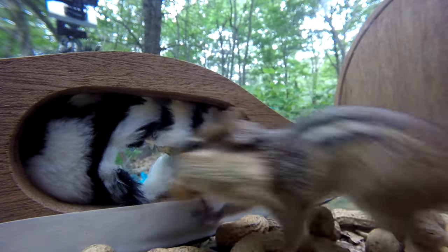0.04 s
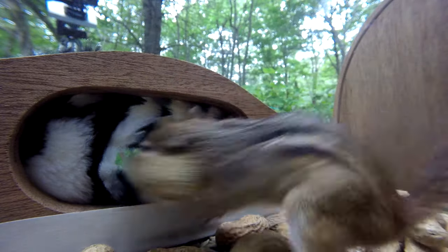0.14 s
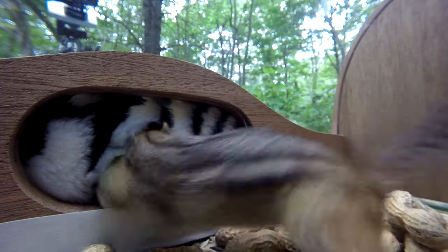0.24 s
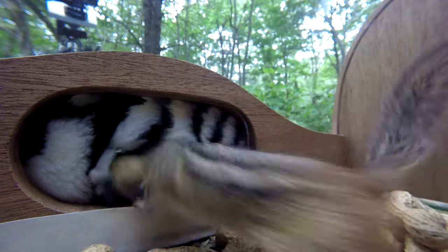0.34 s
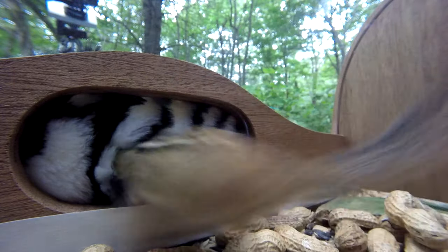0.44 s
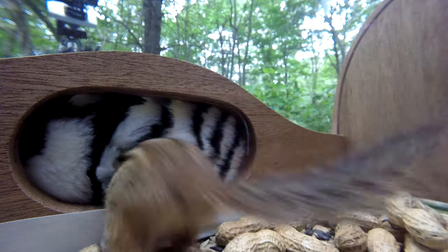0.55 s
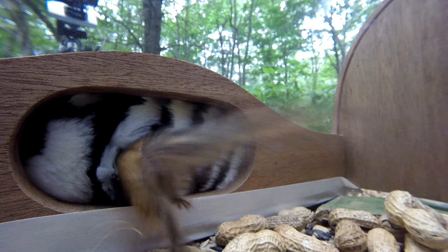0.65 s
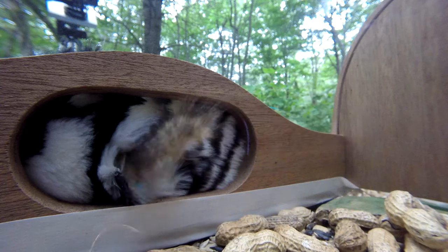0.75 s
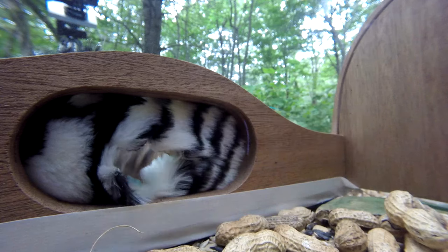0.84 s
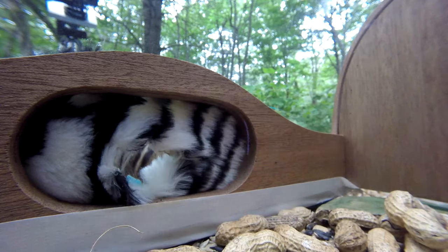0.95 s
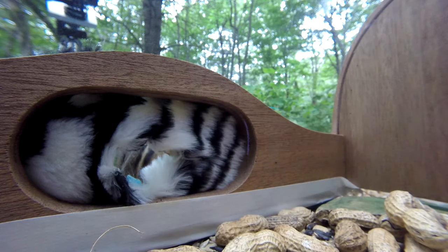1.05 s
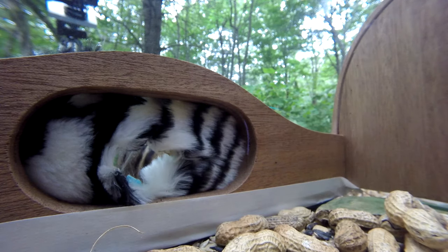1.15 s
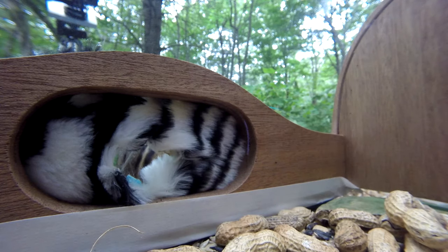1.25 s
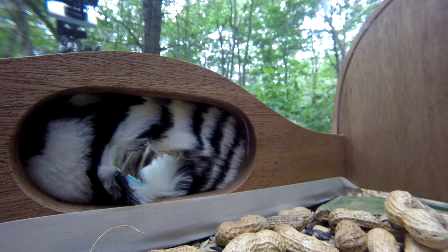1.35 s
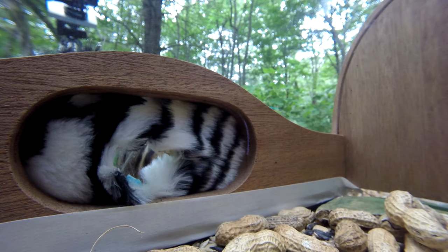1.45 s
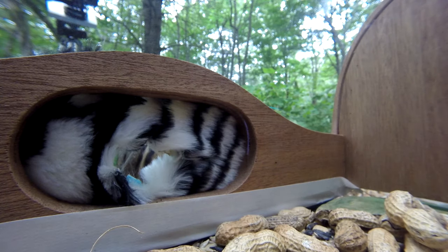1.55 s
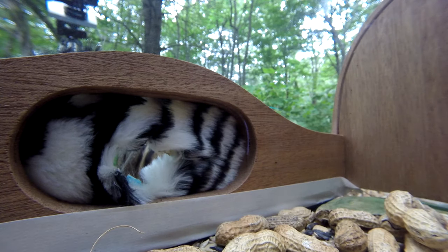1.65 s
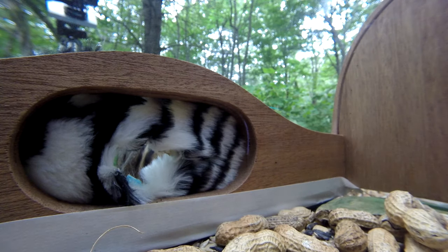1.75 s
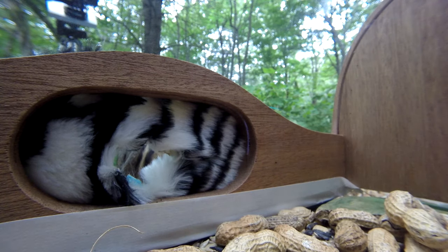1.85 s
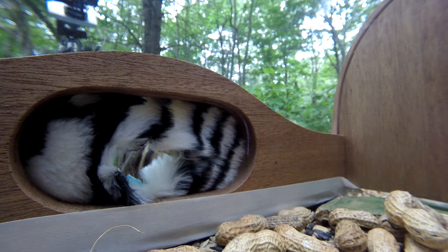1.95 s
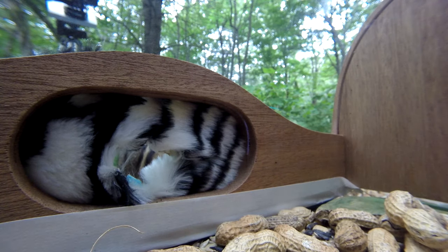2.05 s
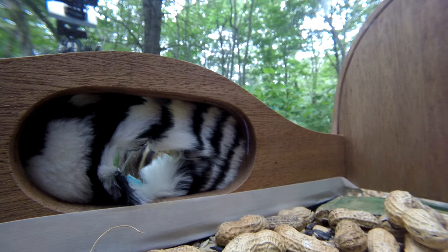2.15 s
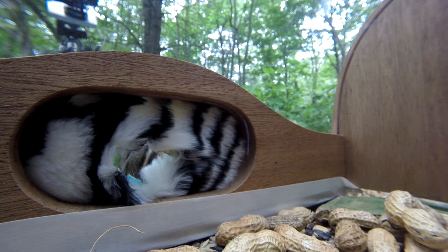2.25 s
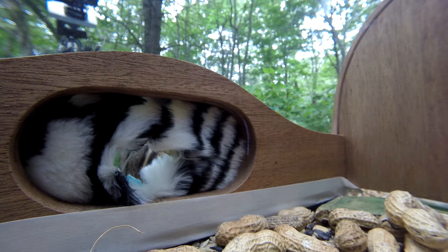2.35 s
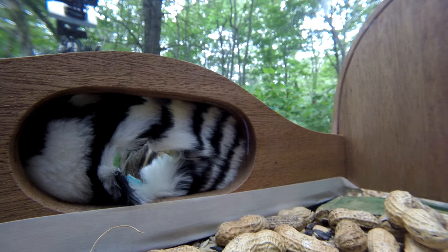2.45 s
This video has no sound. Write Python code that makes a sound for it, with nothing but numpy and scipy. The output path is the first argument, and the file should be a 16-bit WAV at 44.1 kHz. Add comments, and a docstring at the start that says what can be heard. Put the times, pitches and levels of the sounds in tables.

```python
"""A small rodent scrambles over peanuts in their shells on the floor of a wooden box, in woodland air.
For the first second paws thud as pulses exciting board modes, shells knock as resonators struck by clicks,
uneven grains shake, rattle and rustle, and claws scratch as short bursts of band-passed clicks.
It climbs through an opening and jumps off; the two strongest thuds, near 0.86 s, end the footfalls.
Later a few shells settle with faint knocks and two scratches; filtered noise hisses behind throughout."""
import sys
import numpy as np
from scipy import signal
from scipy.io import wavfile

SR = 44100
rng = np.random.default_rng(int(sys.argv[2]) if len(sys.argv) > 2 else 0)


def wav_out(sig):
    """Save sig, one row per channel (or a flat mono array), as 16-bit PCM at SR to the path in sys.argv[1]."""
    wavfile.write(sys.argv[1], SR, np.round(np.clip(np.atleast_2d(sig).T, -1, 1) * 32767).astype(np.int16))


N = 110250

# paws landing on the boards:
# (time [s], push level [dB], contact length [ms], extra push on the lowest mode [dB])
PAW_LANDINGS = [(0.201, -25, 3.3, -17), (0.213, -29.5, 4.7, -25), (0.253, -29, 1.34, -21),
                (0.325, -18.5, 2.5, -21), (0.356, -22, 5.2, -11), (0.518, -27, 3, 5),
                (0.594, -30.5, 1.8, -23), (0.685, -23, 10.7, 7.5), (0.798, -43, 2.4, -23),
                (0.8554, -7, 7.1, -12), (0.869, -7, 5.96, 1.5)]
# shells knocking:
# (time [s], peak level [dB], shell pitch [Hz], longest clatter [ms], wall brightness [dB per octave])
SHELL_KNOCKS = [(.124, -41, 2380, 3.0, 3), (0.141, -28.5, 2240, 2.8, 13), (0.153, -31, 1650, 7.1, -8),
                (.206, -31, 2270, 2.3, -2), (.216, -23, 930, 5.6, -6), (.242, -14, 1810, 2.76, 6.5),
                (0.256, -22, 1020, 4.2, 2), (0.3086, -17.5, 748, 2.5, -6), (.315, -24.5, 1500, 2.85, -7),
                (.323, -20, 1630, 5.3, 1.5), (0.333, -22, 1630, 2.5, 2), (.354, -32, 2360, 3.9, 0),
                (0.397, -3, 1520, 3.98, 1.3), (.504, -23, 2080, 2, 1.5), (.522, -29, 980, 5.5, 1),
                (0.535, -24.5, 1310, 2.73, -0.2), (.547, -33, 840, 3.8, -3), (0.576, -46, 1740, 4.4, 7),
                (0.579, -22.5, 830, 3.35, -2), (.604, -41, 2330, 2.5, 12), (.629, -30, 1776, 2, 7),
                (0.64, -27, 1850, 5.6, -14), (.701, -29.5, 2420, 4.0, 5), (.748, -34, 850, 3.4, -1),
                (.764, -27, 810, 2.9, -5.5), (.856, -25, 1120, 6.3, -6), (0.865, -38, 1020, 3.8, -1),
                (1.145, -38, 1850, 3.8, -2.5), (1.209, -46, 1000, 2.6, -3), (1.286, -48, 1870, 2, 1.5),
                (1.826, -44.5, 2290, 2.5, 1.5), (2.397, -45, 1960, 3.0, 2)]
# uneven motion of the scramble:
# (time [s], board shaking [dB], dull rattle [dB], bright rattle [dB], treble rustle [dB])
SCRAMBLE_LEVELS = [(0, -45.5, -57, -54.5, -54.5), (.09, -50.5, -61, -57.5, -64),
                   (0.113, -53.5, -73, -75, -84), (0.124, -50, -52, -52, -54),
                   (.146, -37.5, -37.5, -35.5, -40.5), (0.174, -41, -52, -49, -57),
                   (0.206, -27, -41.5, -42, -42), (.26, -24, -34, -34, -41.5),
                   (.287, -28.5, -40, -41.5, -50.5), (.312, -38, -44, -32, -38),
                   (0.333, -23.5, -38, -40, -50), (0.362, -23, -35.5, -36, -37),
                   (0.386, -36, -38, -39.5, -51), (.42, -34, -43.5, -47, -49), (.484, -37, -51, -54.5, -63),
                   (.51, -37, -51, -43, -51), (0.541, -28, -31, -47, -55),
                   (0.564, -40.5, -48.5, -55.5, -59.5), (0.584, -32, -47, -34, -51.5),
                   (0.598, -32.5, -45.5, -49, -56), (0.634, -35.5, -38.5, -36.5, -42),
                   (.66, -34.5, -46.5, -44.5, -56), (.696, -33.5, -48, -49, -52.5),
                   (.77, -33, -40.5, -49, -54.5), (0.799, -34, -47.5, -55, -60.5),
                   (0.831, -58.5, -81, -70, -78), (0.85, -32, -50.5, -50, -55),
                   (0.86, -30, -39, -44.5, -57), (.89, -32, -53, -53.5, -58), (.95, -42, -75, -69, -71.5),
                   (1.001, -53, -73, -74, -74)]
# claws scratching: (time [s], level before shaping [dB], centre frequency [Hz], decay length [ms])
CLAW_SCRATCHES = [(.025, -54, 9400, 8.7), (.082, -54.5, 10500, 6), (.138, -41.5, 6500, 13.5),
                  (.201, -41, 8400, 5.8), (.238, -39.5, 5950, 34), (.267, -31, 7900, 3.1),
                  (.31, -38, 5470, 5.3), (.353, -33, 6640, 2.8), (.122, -49, 5000, 8),
                  (.254, -39, 6500, 4.5), (0.298, -46, 8950, 6.7), (0.335, -42, 6100, 7.2),
                  (.366, -49, 8100, 7.2), (.503, -45, 3870, 3.7), (.536, -52, 6000, 5),
                  (.397, -35.5, 4930, 7.4), (.515, -56, 8050, 8), (.62, -52, 5470, 30),
                  (0.852, -46.5, 3840, 10), (1.579, -61, 5400, 5.5), (1.824, -60, 4280, 5.7)]
# resonances of the boards, the first used for depth: (frequency [Hz], level [dB], decay by 60 dB [s])
BOARD_MODES = [(69.7, -5.5, 0.2), (138.4, 0, 0.096), (189, 0, 0.088), (348.6, -2.5, 0.075),
               (376.6, -4, 0.059), (475, 4.5, 0.053), (626, -39, 0.055), (106, -13, 0.087)]
# resonances of walls and shells: (frequency [Hz], level [dB], decay by 60 dB [s])
WALL_MODES = [(524, -10.5, .03), (607, -15.5, 0.069), (814.5, -4.5, 0.032), (1041, -4.5, .035),
              (1520, -2.5, 0.0083), (1850, -6, 0.018), (2017, -6.5, 0.016), (2272, -3.5, 0.014),
              (2692, -2, 0.0067), (3340, -14.5, 0.013), (3780, -26, 0.016), (4650, -19, 0.0071)]
# spectrum of the rustle: (frequency [Hz], level [dB])
RUSTLE_SPECTRUM = [(1500, -9.5), (2500, 12.5), (3600, -8), (4800, 9), (6000, 0.5), (7500, -13.5),
                   (10500, -8), (14500, -8.5), (15500, -36)]
# spectrum of the woodland air: (frequency [Hz], level [dB per Hz])
AIR_SPECTRUM = [(12, -33), (20, -2.5), (64, 0), (157, -2.5), (190, -4), (231, -9.5), (371, -10),
                (451, -14.5), (580, -13.5), (1920, -22), (13800, -45.5), (15500, -53)]

SHELL_T60_S, SHELL_RISE_T60_S, KNOCK_CUT_HZ = 0.025, 0.0047, 7000
WALL_SHARE_DB = -1   # walls over shell, for a knock peaking at -16 dB
SHELL_FOLLOWS = 0.11   # harder blows ring the shell more: dB of shell over walls per dB of blow
RATTLE_PER_S, RATTLE_SPREAD_DB, SHAKE_PER_S = 1500, 3.5, 450
SCRATCH_PER_S, SCRATCH_WIDTH_OCT = 3700, 0.6
SCRATCH_RISE = 0.17   # share of the decay length
AIR_DB = -50
CUTOFF_HZ = 15850


def footfalls():
    """Modal excitation: a raised-cosine contact pulse drives the boards, the lowest mode separately."""
    push, deep = np.zeros(N), np.zeros(N)
    for time_s, db, contact_ms, deep_db in PAW_LANDINGS:
        pulse = np.hanning(int(contact_ms * SR / 1000))
        pulse = pulse / pulse.sum()
        start = int(time_s * SR)
        push[start:][:len(pulse)] += from_db(db) * pulse
        deep[start:][:len(pulse)] += from_db(db + deep_db) * pulse
    # the minus sign keeps the mode signs alternating
    return body(deep, BOARD_MODES[:1]) - body(push, BOARD_MODES[1:])


def knocks():
    """Cascaded resonance: each shell swells and decays while six weakening touches ring the walls."""
    out, span = np.zeros(N), 3000
    chance = rng.random((len(SHELL_KNOCKS), 12 + len(WALL_MODES)))
    wall_filter = signal.butter(2, [420, KNOCK_CUT_HZ], "band", fs=SR, output="sos")
    for (time_s, db, hz, clatter_ms, tilt_db), draw in zip(SHELL_KNOCKS, chance):
        touches = np.zeros(span)
        lag = np.sort(draw[:6]) - draw[:6].min()   # share of the longest clatter
        touch_db = -16 * lag - 3.7 * draw[6:12] * (lag > 0)
        touches[(lag * clatter_ms * SR / 1000).astype(int)] = from_db(touch_db)

        # brightness tilts about 1400 Hz, and chance weakens each mode by up to 4 dB
        modes = [(f, level + tilt_db * np.log2(f / 1400) - 4 * d, t60)
                 for (f, level, t60), d in zip(WALL_MODES, draw[12:])]
        walls = rms_one(signal.sosfilt(wall_filter, body(touches, modes)))

        first_touch = touches * (np.arange(span) == 0)
        shell = ring(ring(first_touch, hz, SHELL_T60_S), hz, SHELL_RISE_T60_S)
        wall_db = WALL_SHARE_DB - SHELL_FOLLOWS * (db + 16)
        sound = rms_one(shell) + from_db(wall_db) * walls
        out[int(time_s * SR):][:span] += from_db(db) * sound / np.abs(sound).max()
    return out


def scramble():
    """Random-impulse excitation: pushes shake the boards; ticks rattle the walls and feed the rustle."""
    times_s, *columns = np.transpose(SCRAMBLE_LEVELS)
    clock = np.arange(N) / SR
    shake, dull, bright, rustle = (
        from_db(np.interp(clock, times_s, c, right=-120)) for c in columns)
    pushes = band(grains(SHAKE_PER_S, 1.73), 108, 293)
    shaking = rms_one(body(pushes, BOARD_MODES))

    ticks = grains(RATTLE_PER_S, RATTLE_SPREAD_DB) * from_db(0.5 * drift(59))
    dull_level = dull * from_db(1.9 * drift(67))
    bright_level = bright * from_db(1.9 * drift(62))
    rattle = 0
    for level, modes in ((dull_level, WALL_MODES[:4]), (bright_level, WALL_MODES[4:])):
        rattle = rattle + body(ticks * level, modes) / np.std(body(ticks, modes))

    grainy_noise = rms_one(ticks) + 2.14 * rng.standard_normal(N)
    rustling = coloured([grainy_noise], RUSTLE_SPECTRUM, patchy_db=0.5)
    return shake * shaking + rattle + rustle * rustling


def scratches():
    """Friction as dense impulses: band-passed clicks rise linearly under a Gaussian decay."""
    out, span = np.zeros(N), 2048
    t_ms = np.arange(span) / SR * 1000
    spread = 2 ** (SCRATCH_WIDTH_OCT / 2)
    for time_s, db, hz, length_ms in CLAW_SCRATCHES:
        rise = np.minimum(t_ms / (SCRATCH_RISE * length_ms), 1)
        shape = rise * np.exp(-(t_ms / length_ms) ** 2)
        clicks = grains(SCRATCH_PER_S, 3.9, size=span)
        rasp = rms_one(band(clicks, hz / spread, hz * spread))
        out[int(time_s * SR):][:span] += from_db(db) * shape * rasp
    return out


def air():
    """Broadband noise: a bass-heavy outdoor hiss whose bands waver slightly."""
    return from_db(AIR_DB) * coloured(rng.standard_normal((2, N)), AIR_SPECTRUM, patchy_db=0.65)


def from_db(db):
    """Logarithmic level: amplitude gain grows tenfold per 20 dB."""
    return 10 ** (np.asarray(db) / 20)


def rms_one(x):
    """Power normalisation: scale to a root mean square of 1."""
    return x / np.sqrt(np.mean(x ** 2) + 1e-20)


def band(x, low_hz, high_hz):
    """Band limitation by a Butterworth band-pass."""
    sos = signal.butter(2, [low_hz, min(high_hz, .45 * SR)], "band", fs=SR, output="sos")
    return signal.sosfilt(sos, x)


def drift(rate_hz):
    """Low-passed noise: a slow random fluctuation of rms about 1."""
    step = 40   # samples between computed points
    r = np.exp(-2 * np.pi * rate_hz * step / SR)
    noise = rng.standard_normal(N // step + 2002)
    slow = signal.lfilter([1], [1, -2 * r, r * r], noise)[2000:]   # skip the start-up
    return np.interp(np.arange(N) / step, np.arange(len(slow)), rms_one(slow))


def ring(clicks, hz, t60):
    """Damped resonance: a unit click starts a decaying sine of initial height 1."""
    r, w = from_db(-60 / (t60 * SR)), 2 * np.pi * hz / SR
    return signal.lfilter([0, np.sin(w)], [1, -2 * r * np.cos(w), r * r], clicks + 1e-18)


def body(clicks, modes):
    """Modal superposition: damped resonances add with alternating signs."""
    return sum((-1) ** k * from_db(db) * ring(clicks, hz, t60)
               for k, (hz, db, t60) in enumerate(modes))


def grains(per_s, spread_db, size=N):
    """Random impulse process: sparse clicks of uneven size and sign."""
    sizes_db = spread_db * np.minimum(rng.exponential(1, size), 4)
    sizes = from_db(sizes_db) * rng.choice([-1, 1], size)
    return sizes * (rng.random(size) < per_s / SR) + 1e-9


def coloured(sources, spectrum, patchy_db):
    """Spectral shaping: half-octave bands flicker separately and sum to rms 1."""
    out, edges, points = 0, 20 * 2 ** np.arange(0, 10, .5), np.array(spectrum)
    for k, (low, high) in enumerate(zip(edges, edges[1:])):
        log_centre = np.log(low * high) / 2
        db = np.interp(log_centre, np.log(points[:, 0]), points[:, 1], left=-80)
        gain = from_db(db + patchy_db * drift(26))
        out = out + (-1) ** k * gain * band(sources[k % len(sources)], low, high)
    return rms_one(out)


def scene():
    """Linear superposition of all sources in one channel."""
    return (footfalls() + knocks() + scramble() + scratches() + air())[None]


def record(dry):
    """Band limitation: a steep low-pass is 60 dB down from the cutoff upward."""
    return signal.sosfilt(signal.cheby2(12, 60, CUTOFF_HZ, fs=SR, output="sos"), dry)


dry = scene()
out = record(dry)
wav_out(out)
```